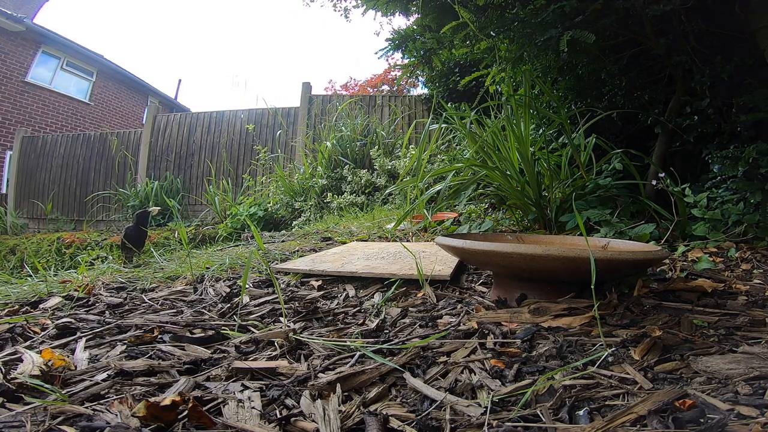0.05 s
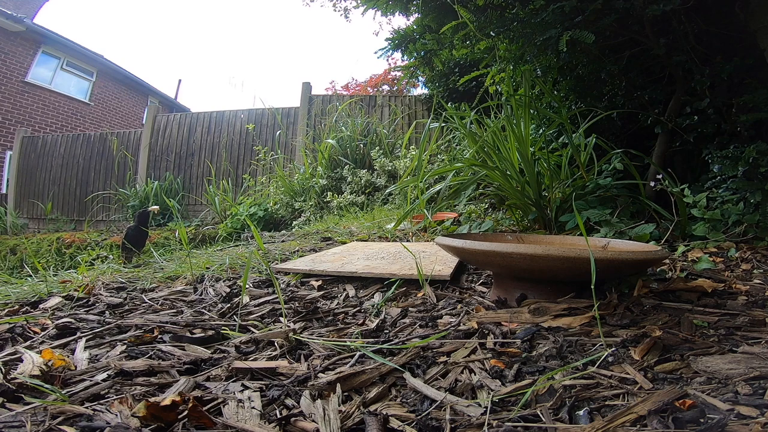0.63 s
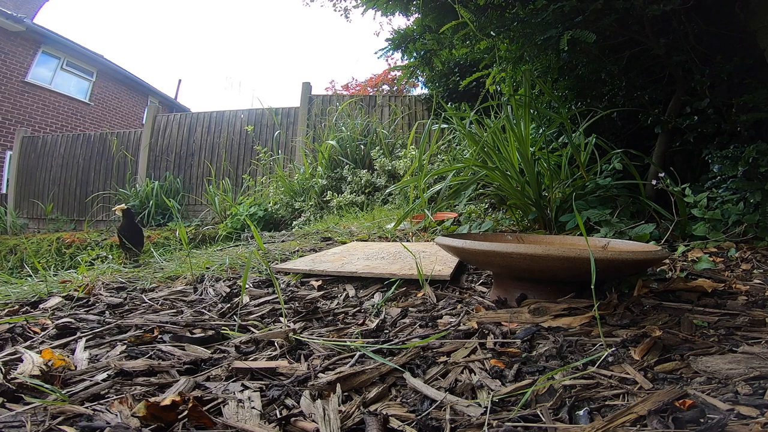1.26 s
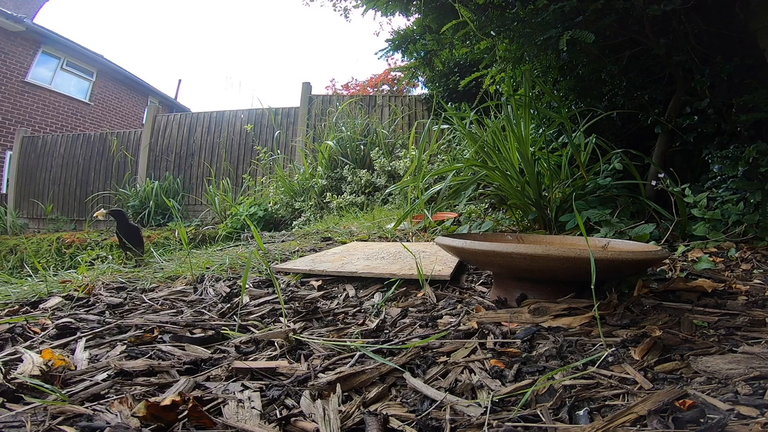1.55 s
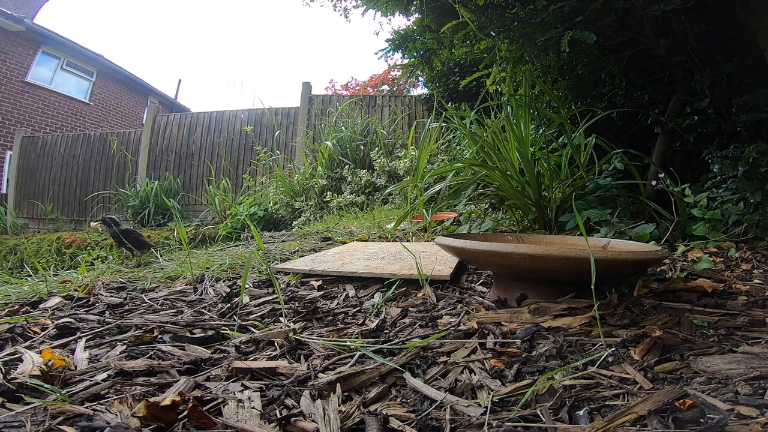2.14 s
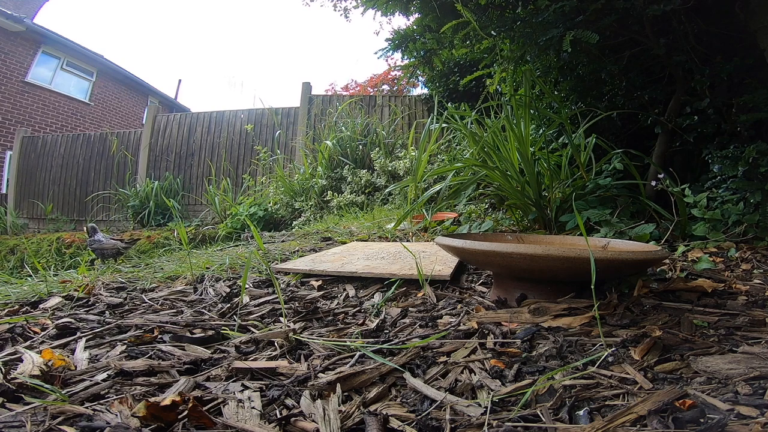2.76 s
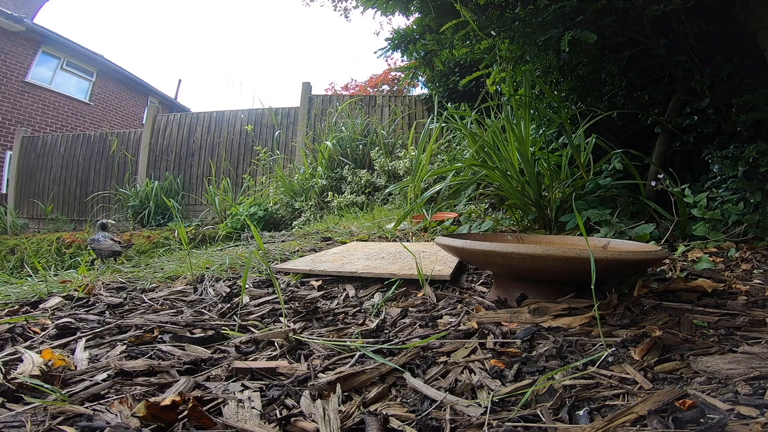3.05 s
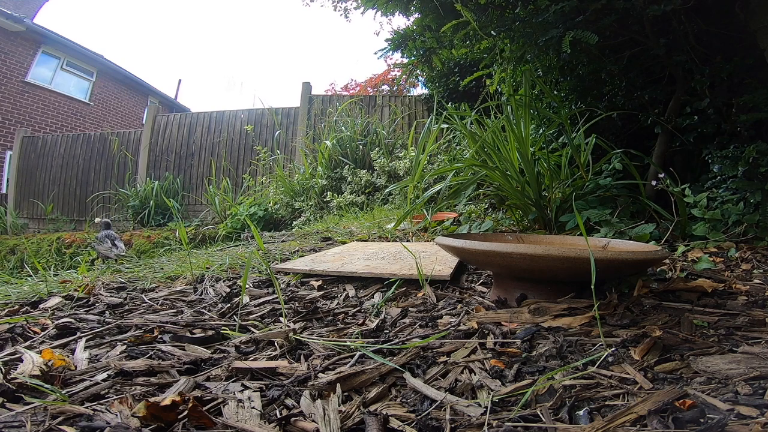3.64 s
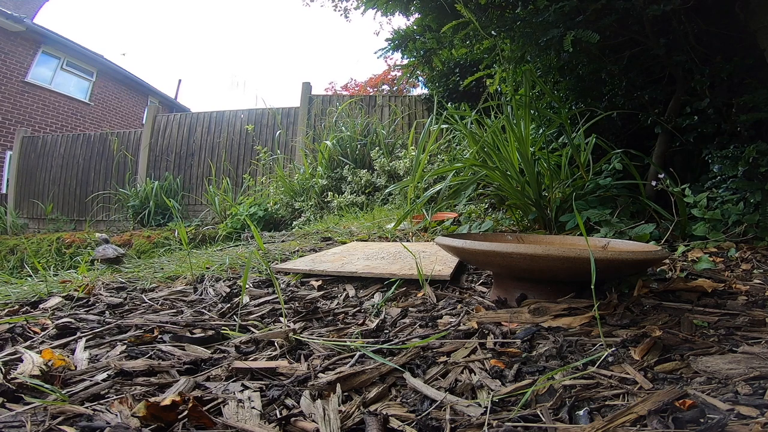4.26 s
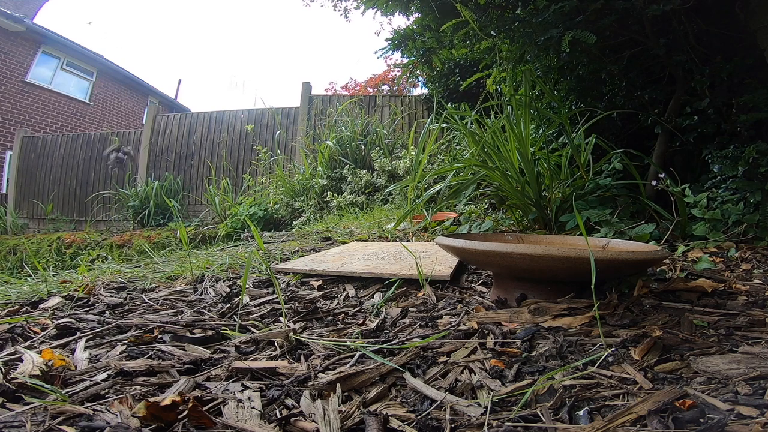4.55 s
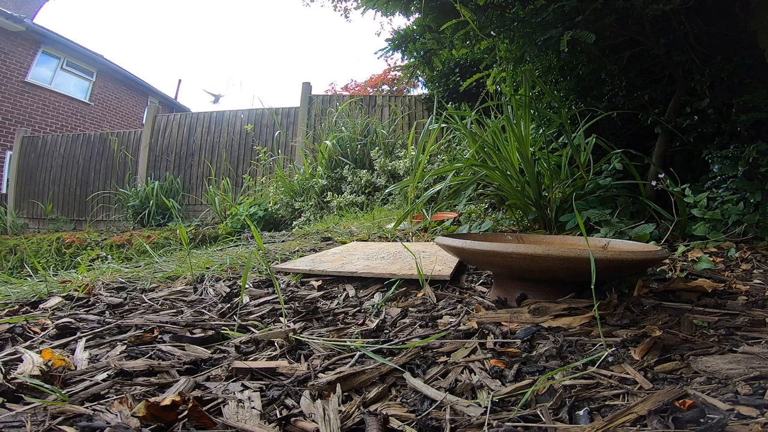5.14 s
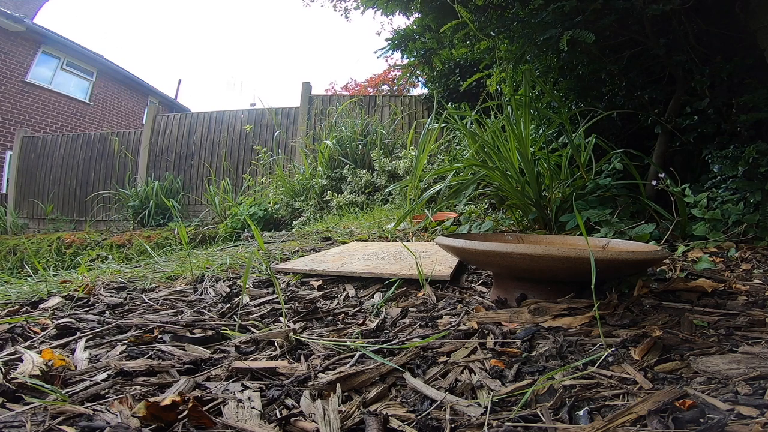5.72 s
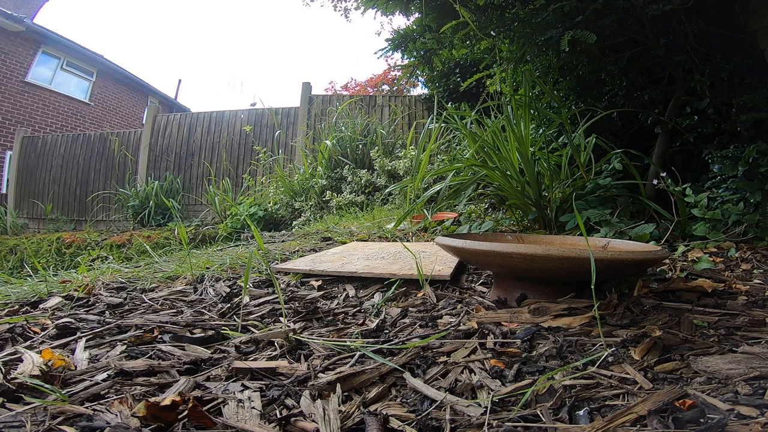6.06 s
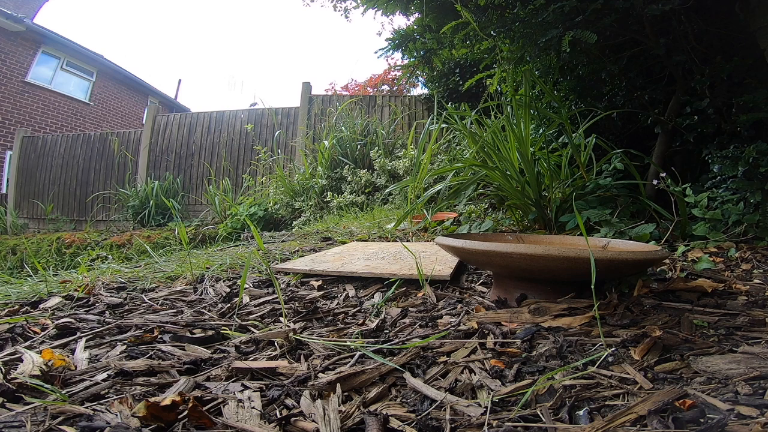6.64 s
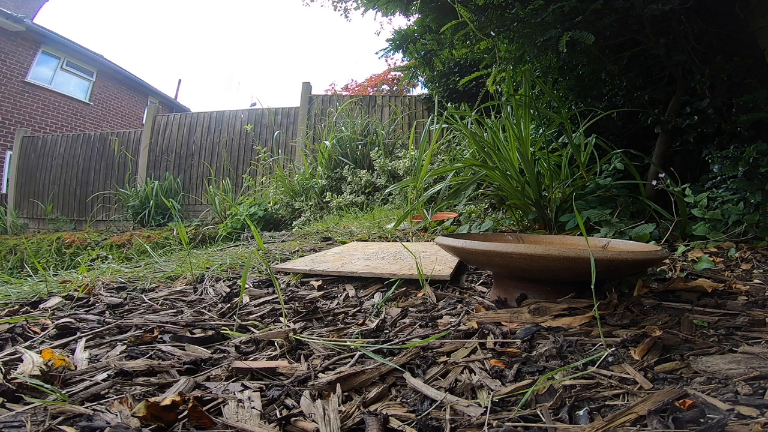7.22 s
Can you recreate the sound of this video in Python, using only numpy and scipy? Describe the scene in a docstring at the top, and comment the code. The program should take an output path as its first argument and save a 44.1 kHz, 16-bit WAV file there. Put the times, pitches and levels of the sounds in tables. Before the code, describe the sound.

Sparrows chirp and twitter in a garden over a light breeze, with two harsh starling rasps, dull thumps and brief wing beats.

```python
"""A starling rasps on the lawn and flies off, in a fenced garden full of house sparrows. One sparrow chirps
close to the microphone, a farther one answers, others twitter in the bushes: each call is a short run of
pitch arches whistled by the syrinx. Dull thumps and wing beats sound over the quiet air, and the starling
calls again from afar. Ground, fence and foliage scatter the calls on their way to a low stereo pair."""
import sys
import numpy as np
from scipy import signal
from scipy.fft import rfft, irfft, next_fast_len
from scipy.io import wavfile

SR = 44100
rng = np.random.default_rng(int(sys.argv[2]) if len(sys.argv) > 2 else 0)


def pcm_store(signal):
    """Save signal as 16-bit PCM."""
    levels = np.round(np.clip(np.atleast_2d(signal), -1, 1) * 32767)
    wavfile.write(sys.argv[1], SR, levels.astype(np.int16).T)


N = 321489


def gain_of(db):
    """Decibels to amplitude."""
    return 10 ** (np.asarray(db) / 20)


def unit_rms(x):
    """Scales to rms 1."""
    return x / np.sqrt(np.mean(abs(x) ** 2) + 1e-20)


def gain_at(spectrum, hz):
    """Amplitude at hz of a (freq_hz, level_db) curve, on a log-frequency axis."""
    f, db = np.transpose(spectrum)
    return gain_of(np.interp(np.log(hz + 1), np.log(f + 1), db))


def add(mix, start_s, sound):
    """Mixes a sound in at start_s."""
    at = round(start_s * SR)
    sound = sound[..., max(-at, 0):]
    part = mix[..., max(at, 0):][..., :sound.shape[-1]]
    part += sound[..., :part.shape[-1]]


def wobble(size, hz):
    """Random motion of rms 1 that rolls off above hz."""
    full = next_fast_len(size)
    f = np.fft.rfftfreq(full, 1 / SR)
    return unit_rms(irfft(rfft(rng.standard_normal(full)) * np.exp(-(f / hz) ** 2), full)[:size])


def coloured(x, spectrum):
    """Filters a sound by a spectrum, to rms 1."""
    full = next_fast_len(len(x))
    f = np.fft.rfftfreq(full, 1 / SR)
    return unit_rms(irfft(rfft(x, full) * gain_at(spectrum, f), full)[:len(x)])


def hump(f, hz, fall_db):
    """A broad low resonance whose treble falls by fall_db an octave."""
    return (f / hz) / (1 + (f / hz) ** 4) ** ((fall_db / (20 * np.log10(2)) + 1) / 4)


# Stereo width of diffuse sound at the microphone: freq_hz, side_over_mid_db
STEREO_WIDTH = [(100, -17), (250, -9), (500, 1), (1200, 0.5), (2500, -4.5), (5000, -5.5), (9000, 1.5)]
def diffuse(size, colour=np.ones_like):
    """Stereo noise from all around, shaped by colour(hz); the two capsules agree in the bass."""
    f = np.fft.rfftfreq(size, 1 / SR)
    mid, side = rfft(rng.standard_normal((2, size)))
    width = gain_at(STEREO_WIDTH, f)
    pair = np.array([mid + width * side, mid - width * side])
    return unit_rms(irfft(pair * colour(f) / np.hypot(1, width), size))


def garden(x, left_db, right_lag_ms, scatter_db, tail_db, scatter_t60=.13, tail_t60=.33, leaf_hz=3600):
    """Direct sound, quick scatter off ground and leaves, and a longer tail between fence and houses."""
    t, f = np.arange(SR) / SR, np.fft.rfftfreq(SR, 1 / SR)
    leaves = np.clip(f / leaf_hz, .5, 2) ** 2 / np.hypot(1, f / (2 * leaf_hz))  # short waves scatter best
    scatter = unit_rms(diffuse(SR) * gain_of(-60 * t / scatter_t60) * (t > .001))
    scatter = irfft(rfft(scatter) * leaves, SR)
    tail = unit_rms(diffuse(SR) * gain_of(-60 * t / tail_t60) * (1 - np.exp(-t / .006)))
    echoes = (gain_of(scatter_db) * scatter + gain_of(tail_db) * tail) / np.sqrt(SR)
    delay = np.exp(-2j * np.pi * np.fft.rfftfreq(N, 1 / SR) * right_lag_ms / 1000)
    direct = np.array([x, irfft(rfft(x) * delay, N)]) * gain_of([[left_db / 2], [-left_db / 2]])
    return direct + signal.fftconvolve(x[None], echoes, axes=1)[:, :N]


# The distant wash around the garden: freq_hz, level_db
WASH_SPECTRUM = [(25, 0.5), (60, 1.5), (120, -6), (190, 2.5), (300, -6), (520, -15.5), (680, -11),
                 (800, -4), (950, -9), (1500, -11.5), (2200, -16), (3500, -10.5), (7000, -20), (12000, -40),
                 (15500, -57)]
# Gusts on the microphone: peak_s, half_width_s, level_db
GUSTS = [(.05, 0.49, -51.5), (.73, 0.088, -45.5), (1.42, 0.14, -47), (4.97, 0.091, -54),
         (6.15, 0.28, -53.5)]
def air(wash_db=-57, calm_db=-60, eddy_db=3):
    """Steady distant wash, with the lumpy low rumble of a light breeze that swells in gusts."""
    t = np.arange(N) / SR
    wash = gain_of(wash_db) * diffuse(N, lambda f: gain_at(WASH_SPECTRUM, f))
    gusts = sum(gain_of(db) * np.exp(-((t - peak_s) / width) ** 2) for peak_s, width, db in GUSTS)
    eddies = gain_of(eddy_db * wobble(N, hz=6))
    rumble = diffuse(N, lambda f: hump(f, hz=50, fall_db=17))
    return wash + (gain_of(calm_db) + gusts) * eddies * rumble


# Low resonances common to the thumps: freq_hz, width_hz, gain_db
THUMP_MODES = [(86, 22, 17), (196, 20, 13)]
# Two dull thumps, three hits each: start_s, level_db, t60_s, body_hz, fall_db_per_octave
THUMPS = [(1.217, -20.5, 0.33, 143, 8.5), (1.267, -30, 0.24, 322, 6.5), (1.32, -34.5, 0.94, 172.5, 7),
          (3.875, -33, 0.64, 324, 7.5), (3.949, -41.5, 0.99, 130, 17), (4.181, -47.5, 0.79, 201, 7)]
def thumps(rise_s=.003, cutoff_hz=2200):
    """Each hit is a low burst of noise through two resonances, quickly dying away."""
    out, t = np.zeros((2, N)), np.arange(SR // 2) / SR
    f = np.fft.rfftfreq(len(t), 1 / SR)
    modes = sum(gain_of(db) / np.hypot(1, 2 * (f - hz) / width) for hz, width, db in THUMP_MODES)
    response = (1 + modes) / np.hypot(1, (f / cutoff_hz) ** 2)
    for start_s, db, t60, hz, fall_db in THUMPS:
        body = diffuse(len(t), lambda f: response * hump(f, hz, fall_db))
        add(out, start_s, body * gain_of(db - 60 * t / t60) * (1 - np.exp(-t / rise_s)))
    return out


# Rustle of feathers: freq_hz, level_db
FEATHER_SPECTRUM = [(1000, -9), (4000, 9), (9000, -5), (13000, -17), (15500, -28)]
# Flights away from the microphone: start_s, length_s, beat_hz, puff_db, body_hz, rustle_db
FLIGHTS = [(0.179, .17, 14, -44, 384, -72), (4.397, .37, 15.1, -37.5, 64, -58)]
def wings(puff_s=.018, rustle_s=.039, upstroke_db=-5, upstroke_pitch=1.2, leaving_db_per_s=27):
    """Strong downstrokes and weak upstrokes puff air and rustle feathers, fading as the bird leaves."""
    out, t = np.zeros((2, N)), np.arange(-SR // 16, SR // 16) / SR
    for start_s, length_s, beat_hz, puff_db, hz, rustle_db in FLIGHTS:
        for stroke, at in enumerate(np.arange(0, length_s, .5 / beat_hz)):
            up = stroke % 2
            puff = diffuse(len(t), lambda f: hump(f, hz * upstroke_pitch ** up, fall_db=9))
            puff *= gain_of(puff_db) * np.exp(-(t / puff_s) ** 2)
            rustle = coloured(rng.standard_normal(len(t)), FEATHER_SPECTRUM)
            rustle *= gain_of(rustle_db) * np.exp(-(t / rustle_s) ** 2)
            add(out, start_s + at + t[0], gain_of(up * upstroke_db - leaving_db_per_s * at) * (puff + rustle))
    return out


# What a sparrow's throat and beak let through: freq_hz, gain_db
BEAK_RESPONSE = [(2000, -6), (2600, -8.5), (3050, 0), (6300, 0), (7300, -0.5), (8600, -10), (10500, -11.5),
                 (13000, -17.5), (15500, -17)]
# Noise in its voice: freq_hz, level_db
HISS_SPECTRUM = [(1500, -38), (2800, -8.5), (4500, 3.5), (7500, -20), (9500, -20.5), (12500, -26.5),
                 (15000, -28)]
def note(length_s, start_hz, top_hz, end_hz, db, rasp, octave_db,
         roundness=1.3, flutter_hz=750, drift=.01407, third_db=-32, hiss_db=-15):
    """The syrinx whistles one pitch arch through the beak; rasp shakes pitch and level and adds hiss."""
    size = round(length_s * SR)
    progress = np.linspace(0, 1, size)
    climb, drop = max(top_hz - start_hz, 1), max(top_hz - end_hz, 1)
    crest = climb / (climb + 1.483 * drop)  # the pitch falls more slowly than it climbs
    from_crest = abs(np.interp(progress, [0, crest, 1], [-1, 0, 1]))
    hz = top_hz - np.where(progress < crest, climb, drop) * from_crest ** roundness
    shake = .055 * rasp * wobble(size, flutter_hz) + drift * wobble(size, hz=103)
    phase = 2 * np.pi * np.cumsum(hz * (1 + shake)) / SR
    tone = sum(gain_of(level) * gain_at(BEAK_RESPONSE, k * hz) * np.sin(k * phase)
               for k, level in enumerate([0, octave_db, third_db], 1))
    tone *= np.sqrt(2) * (1 + .57 * rasp * wobble(size, flutter_hz))
    hiss = coloured(rng.standard_normal(size), HISS_SPECTRUM)
    hiss *= gain_of(hiss_db) * rasp * (1 + gain_of(octave_db))
    swell_db = np.interp(progress, [0, .25, .78, 1], [-11, 0, 0, -11])
    return gain_of(db + swell_db) * (tone + hiss) * signal.windows.tukey(size, .12)


def sing(notes, calls, pitch=1, stretch=1, stray_pitch=.01, stray_db=.7, **voice):
    """A bird repeats one run of notes, each straying a little in pitch and level."""
    out = np.zeros(N)
    for start_s, call_db, *call_pitch in calls:
        for offset_s, length_s, *arch_hz, note_db, rasp, octave_db in notes:
            sharp, loud = rng.standard_normal(2)
            hz = np.array(arch_hz) * pitch * np.prod(call_pitch) * (1 + stray_pitch * sharp)
            db = call_db + note_db + stray_db * loud
            add(out, start_s + offset_s * stretch, note(length_s * stretch, *hz, db, rasp, octave_db, **voice))
    return out


# One twitter: offset_s, length_s, start_hz, top_hz, end_hz, level_db, rasp_amount, octave_db
TWITTER_NOTES = [(-.014, 0.034, 2200, 4350, 3396, -6.5, 0.43, -11),
                 (.02, .021, 3420, 3785, 2890, 1.5, 0.24, -20.5),
                 (.043, .03, 2810, 3990, 2563, 1.5, 0.22, -30.5),
                 (.078, 0.034, 2760, 3240, 2650, -7.5, 0.5, -35)]
# Twitters in the bushes: start_s, level_db
TWITTERS = [(.03, -38), (1.216, -37), (2.978, -39.5), (3.755, -36), (6.782, -34.5)]
# The near sparrow's kind of chirp, sung slower in the bushes: start_s, level_db
BUSH_CHIRPS = [(.57, -37.5), (4.314, -46.5), (6.214, -33.5)]
# Single notes from the flock: start_s, length_s, top_hz, level_db, octave_db
LONE_NOTES = [(0.528, 0.054, 2980, -66, 9.5), (2.155, 0.12, 3670, -51, -19),
              (2.378, 0.11, 3860, -56.5, -40), (3.018, 0.056, 2755, -46, 0), (3.08, .06, 3647, -39, -29),
              (4.113, 0.043, 5830, -59, -30), (4.166, 0.044, 5980, -60.5, -30),
              (4.223, 0.041, 5800, -67, -30), (4.912, 0.053, 5900, -60, -30), (5.334, 0.074, 2797, -46, 0),
              (5.396, 0.047, 3750, -35, -22), (5.826, .055, 6060, -56.5, -30), (5.959, .105, 3040, -47, -6),
              (6.448, 0.048, 5900, -56, -26)]
# Falling slurs, mostly from the flock; the rows at 5.458 s and 6.27 s are a low second voice under the near
# sparrow's chirps: start_s, length_s, top_hz, level_db
SLURS = [(1.308, .05, 3460, -41), (1.35, 0.044, 2950, -52), (3.11, 0.043, 3700, -40),
         (4.524, 0.065, 3240, -42.5), (4.585, 0.027, 3200, -45.5), (5.249, 0.057, 4200, -51.5),
         (5.458, .05, 3100, -42), (5.773, 0.053, 4540, -57), (6.27, .04, 3110, -43)]
def flock():
    """Sparrows off in the bushes twitter, chirp and drop in single notes and slurs; two low slurs sound under
    the near sparrow's chirps."""
    out = sing(TWITTER_NOTES, TWITTERS, roundness=1.1, hiss_db=-7, third_db=-40)
    out += sing(CHIRP_NOTES, BUSH_CHIRPS, pitch=1.01, stretch=1.08, hiss_db=-13, third_db=-25)
    for start_s, length_s, hz, db, octave_db in LONE_NOTES:
        add(out, start_s, note(length_s, .83 * hz, hz, .77 * hz, db, rasp=.5, octave_db=octave_db))
    for start_s, length_s, hz, db in SLURS:
        add(out, start_s, note(length_s, .94 * hz, hz, .53 * hz, db, rasp=.5, octave_db=-22))
    return out


# Colour of the starling's voice: freq_hz, gain_db
RASP_SPECTRUM = [(200, -47), (600, -24), (1300, -9), (1800, 5), (2400, 3.5), (3300, 7.5), (4600, 7.5),
                 (6000, 6), (8200, 9.5), (10200, -12), (12000, -11), (15000, -22)]
# Rasps on the lawn, then far off: start_s, length_s, level_db, pitch_hz, noise_share, cutoff_hz
RASPS = [(.135, .205, -32, 2550, .3, 16000), (6.87, .18, -41, 2250, .85, 8000)]
def starling(trill_hz=79, swing=.19, climb_s=.018, harmonics=(1, 1, .4, .35, .3)):
    """A harsh call whose pitch climbs, then swings in sharp, rapid peaks; distance dulls its treble."""
    out = np.zeros(N)
    for start_s, length_s, db, hz, noise_share, cutoff_hz in RASPS:
        t = np.arange(round(length_s * SR)) / SR
        trill = 1 - np.pi * abs(np.sin(np.pi * trill_hz * (t + .00382))) / 2
        peaks = 1 + np.cos(np.pi * trill_hz * t) / 2  # tall and short swings alternate
        trill = np.minimum(trill, 0) + peaks * np.maximum(trill, 0)
        climb = 1 - .5 * np.exp(-t / climb_s)
        jitter = 1 + .04 * wobble(len(t), hz=600)
        phase = 2 * np.pi * np.cumsum(hz * climb * (1 + swing * trill) * jitter) / SR
        tone = unit_rms(sum(size * np.sin(k * phase) for k, size in enumerate(harmonics, 1)))
        voice = np.sqrt(1 - noise_share) * tone + np.sqrt(noise_share) * rng.standard_normal(len(t))
        distance = signal.butter(2, cutoff_hz, fs=SR, output="sos")
        call = signal.sosfilt(distance, coloured(voice, RASP_SPECTRUM))
        add(out, start_s, gain_of(db) * call * signal.windows.tukey(len(t), .56))
    return out


# A cheep and its squeak: offset_s, length_s, start_hz, top_hz, end_hz, level_db, rasp_amount, octave_db
CHEEP_NOTES = [(-.022, .03, 3800, 4500, 4450, -15, .3, -20), (-.002, .052, 4400, 6150, 4700, -1.5, .24, -7),
               (.034, .022, 5200, 5300, 3600, -12, .3, -14), (.088, .042, 3700, 5200, 4950, -8.5, .3, -11),
               (.122, .04, 4500, 4550, 3500, -22, .6, -14)]
SQUEAK_NOTES = [(-.09, .094, 6870, 6865, 6730, -17.5, 0.32, -36),
                (-.078, 0.09, 7370, 7540, 7370, -25.5, 0.78, -32)]
# Answers from farther down the garden: start_s, level_db
CHEEPS = [(-.1, -31.5), (0.777, -32), (1.499, -31.5), (2.02, -31.5), (2.754, -32.5), (3.553, -32),
          (5.044, -34), (5.556, -32.5), (6.008, -31), (6.609, -30), (7.305, -28.5)]
def answering_sparrow():
    """A thin squeak leads into each flat-topped cheep, sung at two pitches by the sides of the syrinx."""
    upper = sing(CHEEP_NOTES, CHEEPS, roundness=3.2, flutter_hz=485, drift=.008, third_db=-50, hiss_db=-12)
    lower = sing(CHEEP_NOTES, CHEEPS, pitch=.89, roundness=2.6, third_db=-50, hiss_db=-3)
    squeak = sing(SQUEAK_NOTES, CHEEPS, hiss_db=2.5)
    return gain_of(-3) * upper + gain_of(-6) * lower + gain_of(-3.5) * squeak


# One chirp: offset_s, length_s, start_hz, top_hz, end_hz, level_db, rasp_amount, octave_db
CHIRP_NOTES = [(-.03, .042, 2513, 3202, 3114, -30, 1, 7.5), (-.006, .02, 2500, 3598, 3550, -16.5, 0.84, -1),
               (.006, .028, 3694, 4541, 3977, -4, 0.57, -16.5),
               (.023, .024, 3880, 3980, 3150, -4, .45, -10.5), (.039, .054, 3016, 3609, 2606, 0, 0.3, -21),
               (.08, .022, 2850, 2950, 2307, -14, 0.63, -26)]
# Chirps close to the microphone: start_s, level_db, pitch_ratio
CHIRPS = [(.832, -22.5, 1.018), (1.75, -22.5, 1.01), (2.535, -23.5, 1.026), (3.268, -23.5, 1.027),
          (3.895, -25, 1.032), (4.722, -25, 1.045), (5.423, -24, 1.01), (6.291, -25, 1.014),
          (6.907, -24, 1.01)]
def near_sparrow():
    """Each chirp starts with a scratch, arches high and raspy, then falls in a loud, clearer whistle."""
    return sing(CHIRP_NOTES, CHIRPS, roundness=1.4, flutter_hz=720, drift=.015, third_db=-29, hiss_db=-17)


def scene():
    """Each bird has its place: the far sparrows are wettest, the starling on the open lawn driest."""
    bass = (thumps() + wings()).mean(axis=0)  # long waves reach both capsules alike
    return (garden(near_sparrow(), left_db=-1.5, right_lag_ms=-.017, scatter_db=-7, tail_db=-12)
            + garden(answering_sparrow(), left_db=2, right_lag_ms=.039, scatter_db=-8, tail_db=-5)
            + garden(flock(), left_db=-.5, right_lag_ms=.034, scatter_db=-7, tail_db=-2.5)
            + garden(starling(), left_db=2, right_lag_ms=.037, scatter_db=-14, tail_db=-15)
            + bass + air())


def record(dry, low_cut_hz=36, top_hz=15700):
    """The microphone's low cut and band limit."""
    low_cut = signal.butter(2, low_cut_hz, "highpass", fs=SR, output="sos")
    band_limit = signal.firwin(511, top_hz, window=("kaiser", 9), fs=SR)
    return signal.oaconvolve(signal.sosfilt(low_cut, dry), band_limit[None], "same")


dry = scene()
out = record(dry)
pcm_store(out)
```